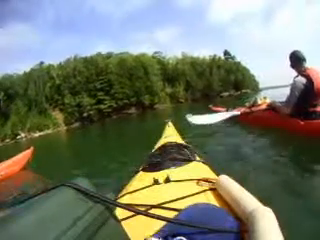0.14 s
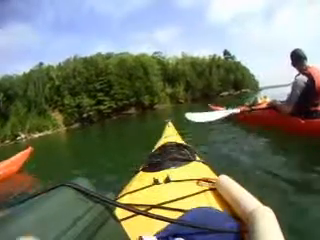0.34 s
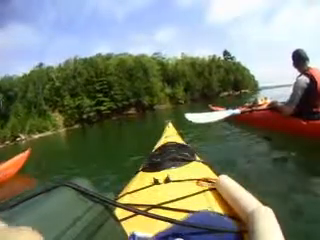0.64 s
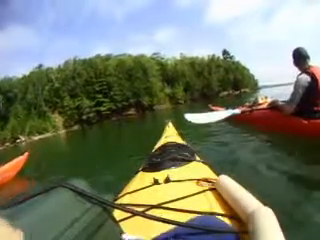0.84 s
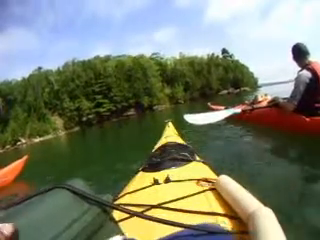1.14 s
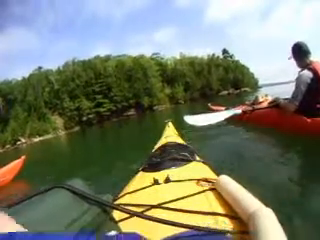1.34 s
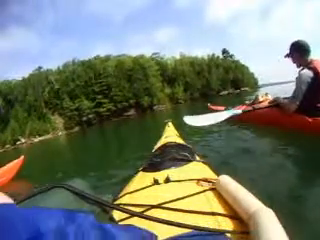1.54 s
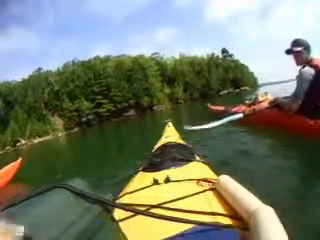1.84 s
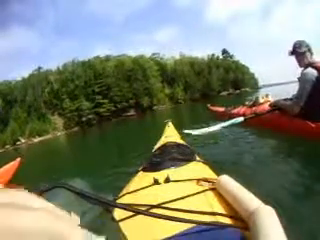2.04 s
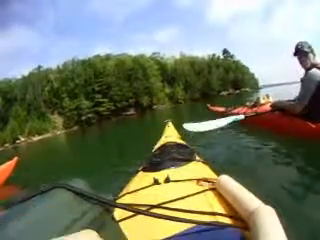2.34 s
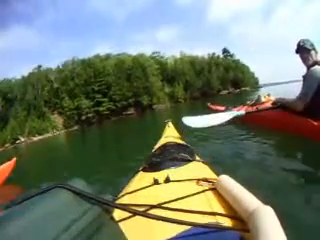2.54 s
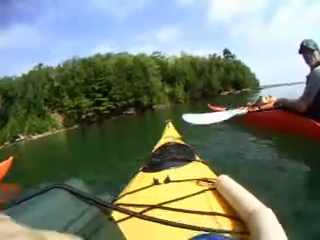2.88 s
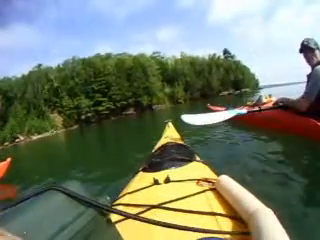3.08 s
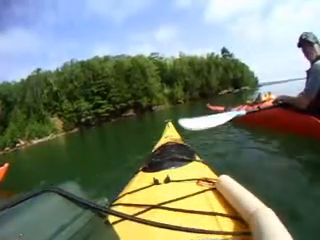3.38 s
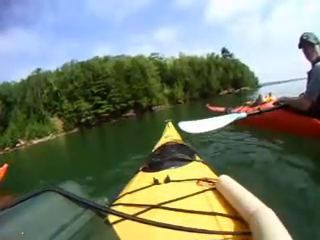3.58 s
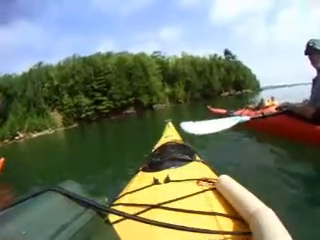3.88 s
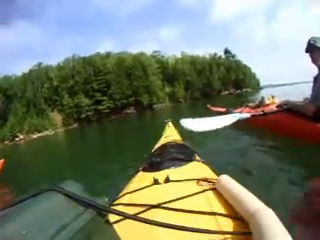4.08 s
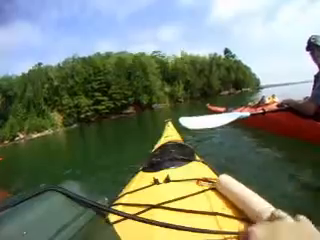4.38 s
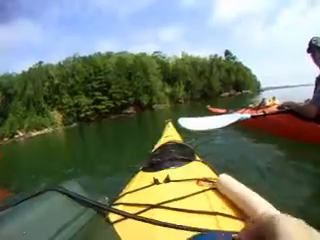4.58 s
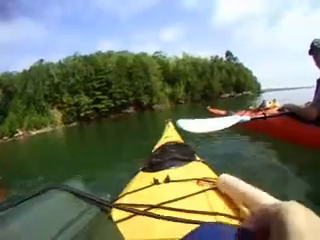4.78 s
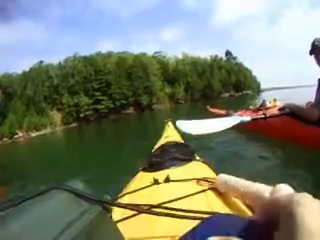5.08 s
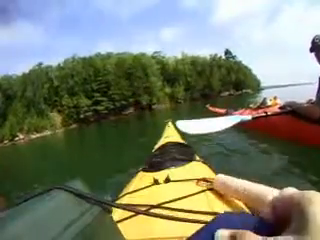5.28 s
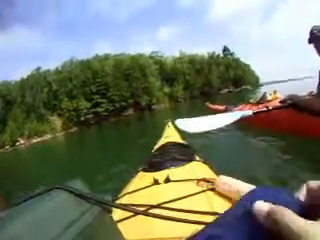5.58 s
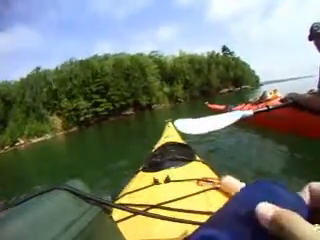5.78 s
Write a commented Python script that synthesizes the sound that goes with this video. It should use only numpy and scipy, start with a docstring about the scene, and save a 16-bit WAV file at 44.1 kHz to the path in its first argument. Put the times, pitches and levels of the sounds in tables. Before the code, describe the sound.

Very close, muffled sound from a housed camera worn in a kayak on open water. Hollow deck knocks come one by one in the first half, with rough hollow rubbing between them. Water and low rumble are left almost alone, then gear scrapes, a hard bump clicks and distorts with a short wet squeak, and final thumps accompany a harsh, loud scrape. Small bubbles and faint wash continue throughout.

```python
"""A kayak drifts on open water, heard from a camera in a plastic housing worn by the paddler.
A knock on the hollow deck and gear scraping at the housing come first, then more knocks ring the deck
modes while the shaft drags over it as filtered friction noise. Short wet squeaks follow, then one hard
jolt that overloads the microphone: two clicks, a low body and a slow sway; last the loudest scraping.
Water noise and bubbles wash and gurgle throughout, with swells of low rumble, the last from handling."""
import sys
import numpy as np
from scipy import signal
from scipy.fft import rfft, irfft
from scipy.io import wavfile
from scipy.ndimage import uniform_filter1d

SR = 44100
rng = np.random.default_rng(int(sys.argv[2]) if len(sys.argv) > 2 else 0)


def store_pcm(level_fs):
    """Save levels as 16-bit WAV."""
    pcm = np.round(np.clip(level_fs, -1, 1) * 32767).astype(np.int16)
    wavfile.write(sys.argv[1], SR, np.atleast_2d(pcm).T)


N = 261072
TIME = np.arange(N) / SR
SIZE = 8192  # filter length, samples
FREQ = np.maximum(np.arange(SIZE // 2 + 1) * SR / SIZE, 1)

# resonances of shaft and deck under friction: pitch_hz, width_hz, level_db (relative)
SHAFT_MODES = [(130, 130, 21), (313, 216, 14.5), (721.5, 84, 9.5), (999, 197, 6), (1765, 326, 1.5),
               (2360, 366, -2), (2960, 590, -13.5), (4650, 500, -21), (5570, 690, -18), (6270, 110, -18),
               (7080, 360, -29.5), (9580, 2200, -30.5)]


def knocks(flutter_db=-21, flutter_t60=0.25, click_db=-25, rebound_s=0.0059, rebound_db=-7,
           body_share=0.53, tick_db=-3):
    """Each knock or thump rings the deck modes; place and hardness of the contact set its colour."""
    # knocks and thumps, including the low body of the jolt near 4.8 s:
    # start_s, peak_db, boom_pitch_ratio, ring_time_ratio, hardness_db
    knock_rows = [(.229, -14.5, 0.9, 0.92, 3.5), (1.212, -9, 1.04, 1.34, -13.5),
                  (1.894, -7, 0.95, 1.19, -5.5), (2.491, -5, .88, 0.58, 1.5), (2.574, -23.5, 0.87, 1.2, 12),
                  (2.581, -17.5, 0.93, 1.1, -21), (2.69, -23, 1, 1.9, -6), (3.207, -21, 0.59, 0.86, -9.5),
                  (4.627, -24, .84, 0.84, 9), (4.787, -9.5, 0.52, 0.43, -19), (4.797, -19, .93, 0.38, 8),
                  (4.809, -7.5, .6, 1.5, -13.5), (4.912, -21.5, 1, 2, 1), (5.024, -16.5, .8, 3.6, -19),
                  (5.391, -20, .91, 1.3, -3), (5.539, -20.5, 0.97, 1.1, -16),
                  (5.584, -9.5, 0.74, 0.83, -35), (5.757, -28, 1, 1.9, -11), (5.778, -8.5, 0.69, 0.94, -27),
                  (5.817, -18, 0.58, 0.63, -22)]
    # modes of deck and hull: pitch_hz, level_db (relative), t60_s; each knock scales pitch and t60
    deck_modes = [(104.9, -9.5, 0.61), (147.7, 1.5, 0.15), (177.2, 1, 0.15), (250.4, -3.5, 0.11),
                  (288, 1, 0.077), (329.5, -5, 0.12), (424, 3, 0.044), (531, -8.5, 0.074),
                  (595, -24.5, 0.017), (725, -26, 0.42), (736.5, -5.5, 0.081), (843, -11, 0.033),
                  (1063, -16.5, 0.026), (1830, -36.5, .035), (2465, -16, 0.035), (4260, -54, .012)]
    boom_top_hz = 560  # below this the deck's pitch depends on where it is struck
    click_slope = slope([(1000, 10.5), (2500, -6), (5000, -2.5), (10000, -16.5)])
    out, t = np.zeros(N), TIME[:SR // 2]
    for start, peak_db, pitch, ring, hardness_db in knock_rows:
        boom = np.zeros(len(t))
        for k, (hz, mode_db, t60) in enumerate(deck_modes):
            mode_hz = hz * pitch if hz < boom_top_hz else hz
            # groups of neighbouring modes start in opposite directions, so the boom takes a cycle to build
            sign = (-1) ** (k // 3)
            boom += sign * undb(mode_db) * np.sin(2 * np.pi * mode_hz * t) * ringdown(t, t60 * ring)
        # the deck springs back and makes contact a second time
        boom = boom + undb(rebound_db) * np.interp(t - rebound_s / pitch, t, boom, left=0)
        # the many weak modes of the long hull blur into a short noisy tail
        tail = unit(colour(rng.standard_normal(len(t)), resonances(SHAFT_MODES)), 55, 3000)
        tail = tail * ringdown(t, flutter_t60)
        # the hard surfaces click as they meet
        click = colour(rng.standard_normal(len(t)), click_slope) * np.exp(-t / 0.0024)
        # a harder contact is shorter and reaches the higher modes
        contact = slope([(150, 0.011), (330, body_share * hardness_db),
                         (730, hardness_db), (2000, hardness_db + tick_db)])
        mix = boom / np.abs(boom).max() + undb(flutter_db) * tail + undb(click_db) * click
        knock = colour(mix, contact)
        add(out, start, undb(peak_db) * knock / np.abs(knock).max())
    return out


def scrapes(dull_db=-2, bright_db=0, judder_db=1.0, curve=1.36):
    """Gear rubs on the housing in juddering strokes, each with its own brightness."""
    # strokes of gear: greatest_pressure_s, rise_s, fall_s, level_db (relative), brightness_db
    strokes = [(0.252, 0.047, 0.11, -40.5, 0.5), (.3, .04, 0.041, -39.5, -9),
               (.415, 0.059, 0.11, -48.5, -8.5), (0.564, 0.042, 0.029, -42, -1),
               (4.445, 0.012, .03, -47.5, 3.5), (4.47, 0.018, 0.074, -36.5, -1),
               (4.502, 0.028, 0.036, -36, 0), (4.552, 0.03, 0.037, -45.5, 0),
               (4.665, 0.087, 0.059, -47, -3.5), (4.701, 0.02, 0.042, -40, 0.5),
               (4.758, 0.024, 0.1, -40.5, -1), (5.412, 0.036, 0.032, -48, -4.5),
               (5.445, 0.017, 0.018, -45.5, 0.5), (5.463, 0.018, 0.027, -46, 2),
               (5.514, .025, 0.038, -47, -7), (5.591, 0.026, .04, -41, -2.5), (5.63, .03, 0.21, -47, -4),
               (5.69, 0.023, 0.086, -30.5, 0), (5.715, 0.023, 0.037, -29.5, 4),
               (5.733, 0.02, 0.035, -25.5, 0.5), (5.845, 0.035, .025, -50.5, 0)]
    # housing resonances: pitch_hz, width_hz, level_db (relative)
    housing_modes = [(130.5, 158, 14), (351, 193, 8.5), (746, 97, 8), (1078, 144, 0.5), (1486, 157, -3.5),
                     (1790, 250, -7), (2547, 430, -5.5), (3015, 260, -9), (3530, 124, -14),
                     (5030, 990, -19.5), (5230, 300, -19), (8890, 520, -30.5), (10510, 830, -33.5)]
    # where the gear touches decides which wall rings: time_s, back_wall_db, side_wall_db
    wall_s, back_db, side_db = np.transpose([(.25, -20, -3.5), (.56, -15, -15), (4.5, -3, -7),
                                             (5.449, -3.5, -17), (5.73, 0, -9)])
    back_wall, side_wall = [(1064, 130, 0)], [(1600, 105, -1.0), (1764, 59, -1.0)]  # Hz, width Hz, dB

    judder = undb(judder_db * walk(110))
    steady_rub = slips(rate=1200, spread_db=4, smooth=.4)
    rub = steady_rub * judder
    body = resonances(housing_modes)
    high_share = 1 / (1 + (2100 / FREQ) ** 8)
    dull = undb(dull_db) * unit(colour(rub, body * np.sqrt(1 - high_share)), 664, 2000)
    bright = undb(bright_db) * unit(colour(rub, body * np.sqrt(high_share)), 1700, 6000)
    for wall, wall_db in (back_wall, back_db), (side_wall, side_db):
        # the same slips in another order, so that each wall rings independently
        ring = colour(rng.permutation(steady_rub) * judder, resonances(wall))
        dull = dull + undb(np.interp(TIME, wall_s, wall_db)) * ring / np.std(ring)

    dull_level, bright_level = 0, 0
    for peak_s, rise, fall, db, brightness_db in strokes:
        push = undb(db) * swell(peak_s, rise, fall, curve)
        dull_level = np.maximum(dull_level, push)
        bright_level = np.maximum(bright_level, undb(brightness_db) * push)
    return dull_level * dull + bright_level * bright


def drags(db=0.0, judder_db=1.84, catch_db=1.5, curve=1.36):
    """The shaft slides over the deck, catching and letting go: a duller and hollower rub."""
    # moves of the shaft: greatest_pressure_s, rise_s, fall_s, level_db
    moves = [(1.1, 0.13, 0.091, -58), (1.235, 0.043, 0.055, -47), (1.41, 0.1, 0.27, -59),
             (1.735, .04, 0.04, -60.5), (1.8, 0.027, 0.022, -53), (1.925, 0.019, 0.036, -56),
             (2.01, 0.072, 0.13, -56), (2.55, 0.046, 0.11, -50.5), (2.63, 0.065, 0.16, -51),
             (2.808, 0.04, 0.063, -42), (2.98, 0.15, 0.12, -47), (3.07, 0.072, 0.24, -51.5),
             (3.335, 0.077, 0.16, -46.5), (3.39, 0.064, 0.053, -47), (3.5, 0.25, 0.28, -62.5),
             (3.82, 0.49, 0.11, -60), (4.01, 0.19, 0.2, -61), (4.85, 0.15, 0.17, -43),
             (5.03, 0.025, 0.094, -41.5), (5.21, 0.07, 0.05, -53.5)]
    unevenness = undb(judder_db * walk(70) + catch_db * walk(35))
    rub = slips(rate=1400, spread_db=2.0, smooth=0.56) * unevenness
    hollow_rub = unit(colour(rub, resonances(SHAFT_MODES)), 1260, 3000)
    return undb(db) * pushes(moves, curve) * hollow_rub


def squeaks(jitter=0.072, overtones_db=(0, -10, -38, -30)):
    """Wet plastic sticks and slips at an unsteady pitch, with overtones."""
    # short squeaks: start_s, length_s, centre_pitch_hz, level_db (rms before the edges are faded)
    squeak_rows = [(3.69, 0.0059, 2570, -50), (4.221, 0.0065, 2780, -59), (4.66, 0.0064, 2640, -44),
                   (4.695, 0.0094, 2695, -34.5), (4.8032, 0.0127, 2613, -21.5),
                   (4.818, 0.0068, 2680, -28.5), (5.439, 0.014, 2675, -46)]
    out, waver = np.zeros(N), walk(1500)
    for start, length, hz, db in squeak_rows:
        i, n = int(start * SR), int(length * SR)
        phase = 2 * np.pi * np.cumsum(hz * (1 + jitter * waver[i:i + n])) / SR
        tone = sum(undb(part_db) * np.sin((k + 1) * phase) for k, part_db in enumerate(overtones_db))
        add(out, start, undb(db) * tone / np.std(tone) * signal.windows.tukey(n, .3))
    return out


def jolts():
    """Pushes on the camera: overload clicks of the microphone, and slow sways that pump the air at it."""
    # one hard jolt overloads the microphone, heard as two clicks: start_s, level_db (before colouring), decay_s
    overload_rows = [(4.7973, 0.5, 0.00022), (4.7987, 0.5, 0.0015)]
    # the camera swaying on its strap after a push: start_s, pitch_hz, level_db (before onset), t60_s
    sway_rows = [(.232, 27, -11.5, 0.15), (0.507, 21, -18, 0.27), (4.798, 21, -9, 1),
                 (5.792, 38.6, -12, 0.17)]
    clicks, sways, t = np.zeros(N), np.zeros(N), TIME[:SR]
    for start, db, decay in overload_rows:
        add(clicks, start, -undb(db) * np.exp(-t / decay))
    for start, hz, db, t60 in sway_rows:
        onset = 1 - np.exp(-t / 0.0083)
        add(sways, start, undb(db) * np.sin(2 * np.pi * hz * t) * ringdown(t, t60) * onset)
    click_slope = slope([(500, 2.5), (1500, 3), (3500, -2.5),
                         (7000, -22.5), (10500, -8.0), (12500, -36)])
    return colour(clicks, click_slope) + sways


def water(rumble_db=-1, gurgle_db=-4, wash_db=-1, bubble_db=-11):
    """Water washes and gurgles throughout with small bubbles, over swells of low rumble."""
    # spectrum of the water noise: pitch_hz, level_db (per Hz, relative)
    water_slope = slope([(15, -10.5), (25, 5), (45, -13), (70, -6.5), (130, -7), (280, -21.5), (600, -27.5),
                         (740, -26), (1350, -34), (3100, -38.5), (4050, -49.5), (4800, -47), (5600, -50.5),
                         (7200, -66.5), (11000, -64.5)])
    # swells of low rumble, the last ones from handling the camera: crest_s, rise_s, fall_s, level_db
    swell_rows = [(.45, 0.14, 0.3, -40), (1.45, 1, 0.56, -42.5), (2.7, 0.17, 0.5, -37), (3.5, 1, 0.83, -38),
                  (4.78, 0.41, 0.21, -33.5), (5.3, 0.2, 0.77, -35.5), (5.72, 0.099, 0.24, -25)]
    floor_db, water_db = -45, -58  # the rumble between swells; the wash and small bubbles

    low_share = 1 / (1 + (FREQ / 400) ** 4)
    rumble = unit(colour(rng.standard_normal(N), water_slope * np.sqrt(low_share)), 94, 300)
    rumble = rumble * undb(rumble_db + 2 * walk(18))
    gurgle = undb(gurgle_db) * bubbles(lo_hz=104.8, hi_hz=439.7, cycles=2.38, count=150)
    grains = slips(rate=6200, spread_db=3, smooth=0.56)
    wash = unit(colour(grains, water_slope * np.sqrt(1 - low_share)), 330, 4000)
    wash *= undb(wash_db + 0.52 * walk(3.83) + 1.0 * walk(23))
    tinkle = undb(bubble_db) * bubbles(lo_hz=445, hi_hz=2700, cycles=5, count=130)
    low_level = np.hypot(undb(floor_db), pushes(swell_rows, curve=2.02))
    return low_level * (rumble + gurgle) + undb(water_db) * (wash + tinkle)


def bubbles(lo_hz, hi_hz, cycles, count):
    """Trapped air rings for a few cycles at a rising pitch, with a lean to louder low ones; rms 1."""
    out, t = np.zeros(N), TIME[:SR // 8]
    for when, size, strength in rng.random((count, 3)):
        hz = lo_hz * (hi_hz / lo_hz) ** size
        turns = hz * t * (1 + 2.87 * t)
        envelope = np.exp(-turns / cycles) * (1 - np.exp(-turns))
        add(out, when * N / SR, undb(13.6 * strength) / hz * np.sin(2 * np.pi * turns) * envelope)
    return out / np.std(out)


def slips(rate, spread_db, smooth):
    """Friction: tiny slips of uneven size, rate per second, over a share of smooth hiss."""
    when = rng.random(N) < rate / SR
    sizes = undb(spread_db * np.clip(rng.standard_normal(N), -2, 2))
    clicks = when * rng.choice([-1, 1], N) * sizes
    return clicks / np.std(clicks) + smooth * rng.standard_normal(N)


def swell(peak_s, rise_s, fall_s, curve):
    """Gain of one push: up from 0.12 over rise_s, back to 0.12 over fall_s; a higher curve rounds the top."""
    away = np.maximum((peak_s - TIME) / rise_s, (TIME - peak_s) / fall_s)
    return 0.12 ** (np.minimum(away, 10) ** curve)


def pushes(rows, curve):
    """Gain of overlapping (peak_s, rise_s, fall_s, level_db) pushes, summed in power."""
    return np.sqrt(sum((undb(db) * swell(s, rise, fall, curve)) ** 2 for s, rise, fall, db in rows))


def walk(rate):
    """Random levels held for 1 / rate s and slewed from one to the next; standard deviation 1."""
    k = max(int(SR / rate), 1)
    held = rng.standard_normal(4096)[np.arange(N) // k % 4096]
    smooth = uniform_filter1d(held, k)
    return smooth / np.std(smooth)


def ringdown(t, t60):
    """Exponential decay by 60 dB in t60 seconds."""
    return np.exp(-np.log(1000) * t / t60)


def resonances(rows):
    """Gain of steep-sided (pitch_hz, width_hz, level_db) resonances, summed in power."""
    return np.sqrt(sum((undb(db) / (1 + ((FREQ - hz) / width * 1.6) ** 2)) ** 2 for hz, width, db in rows))


def slope(points):
    """Gain through (pitch_hz, level_db) points, straight over log frequency."""
    hz, db = np.transpose(points)
    return undb(np.interp(np.log(FREQ), np.log(hz), db))


def colour(x, gain):
    """Causal minimum-phase filter with the given gain at each FREQ."""
    cepstrum = irfft(np.log(gain + 1e-9))
    # folding the cepstrum forward in time gives the minimum phase
    cepstrum[1:SIZE // 2] *= 2
    cepstrum[SIZE // 2 + 1:] = 0
    response = irfft(np.exp(rfft(cepstrum)))[:SIZE // 2]
    return signal.fftconvolve(x, response)[:len(x)]


def band(x, lo_hz, hi_hz):
    """Band-pass filter."""
    sos = signal.butter(3, [lo_hz, min(hi_hz, SR / 2 - 1)], "band", fs=SR, output="sos")
    return signal.sosfilt(sos, x)


def unit(x, lo_hz, hi_hz):
    """Scale a sound so that one band of it has rms 1."""
    return x / np.std(band(x, lo_hz, hi_hz))


def undb(db):
    """Decibels to gain."""
    return 10 ** (np.asarray(db) / 20)


def add(out, s, sound):
    """Mix a sound in from time s."""
    i = int(s * SR)
    out[i:i + len(sound)] += sound[:N - i]


def scene():
    """Everything is within arm's reach, and open water returns no echo."""
    return (knocks() + scrapes() + drags() + squeaks() + jolts() + water())[None]


def record(dry):
    """The camera rounds off peaks at full scale and cuts the top above 11.7 kHz."""
    rounded = dry / (1 + dry ** 8) ** (1 / 8)
    return signal.sosfilt(signal.ellip(10, .2, 95, 11700, fs=SR, output="sos"), rounded)


dry = scene()
out = record(dry)
store_pcm(out)
```